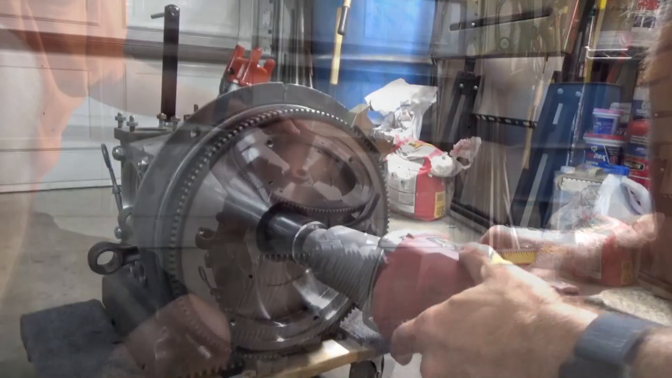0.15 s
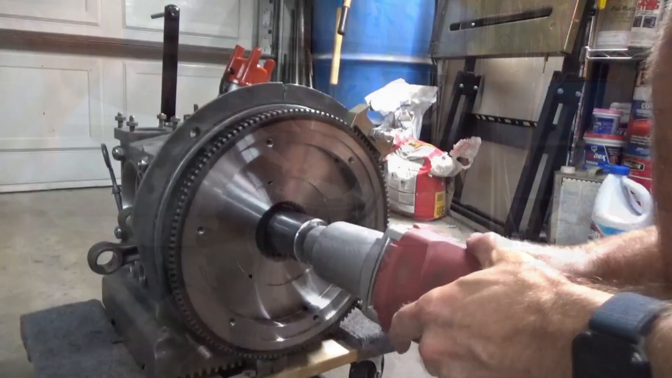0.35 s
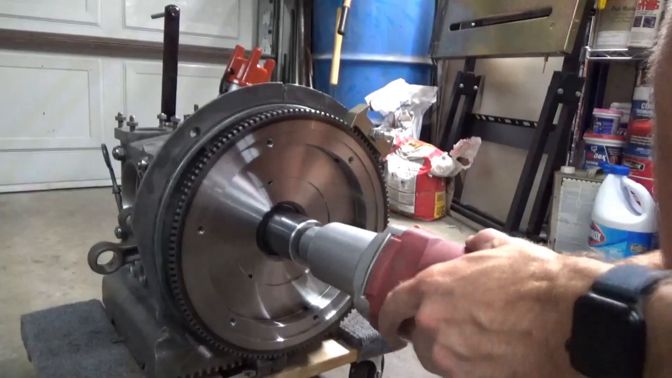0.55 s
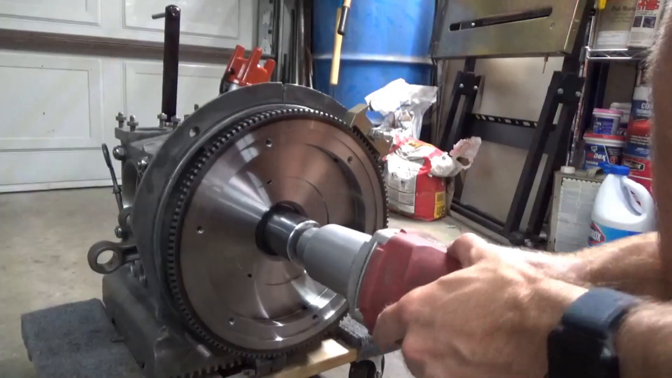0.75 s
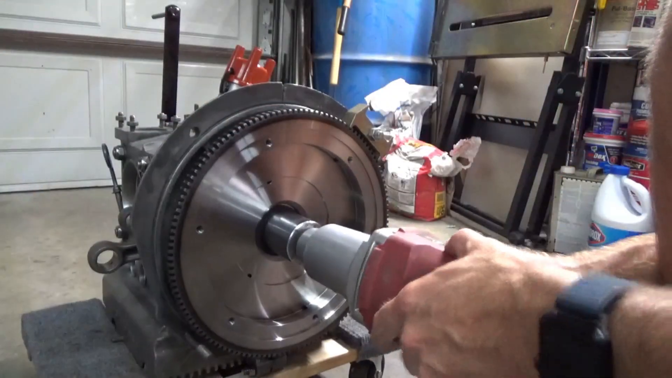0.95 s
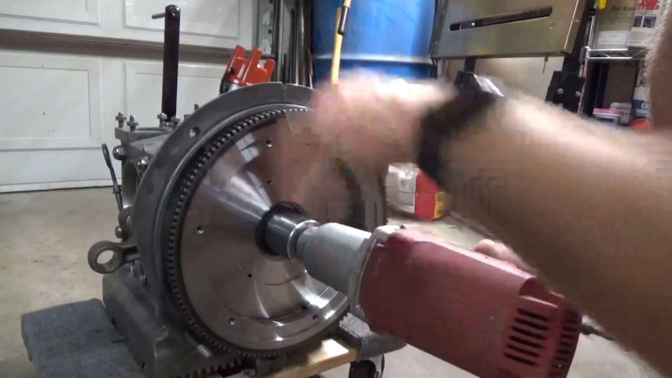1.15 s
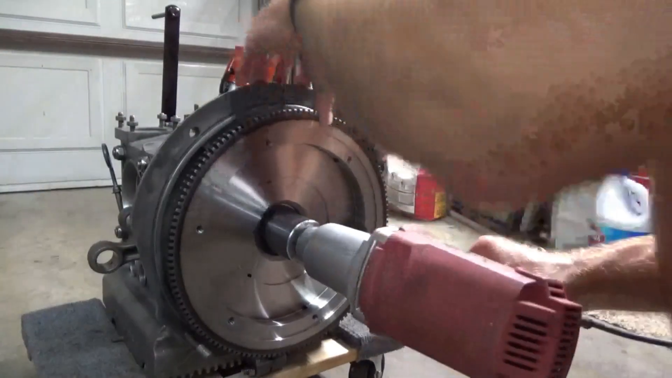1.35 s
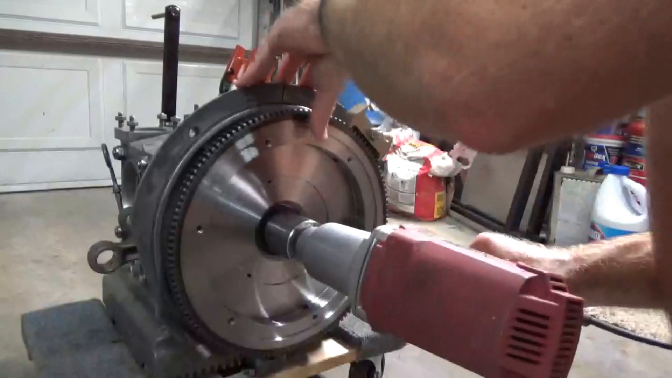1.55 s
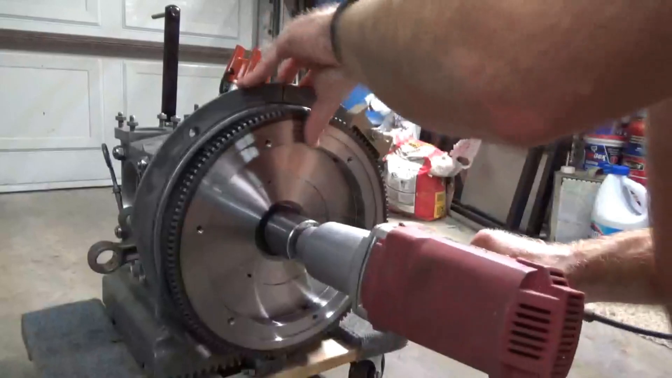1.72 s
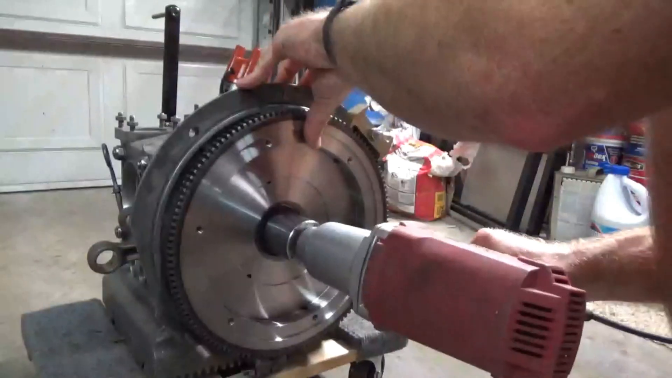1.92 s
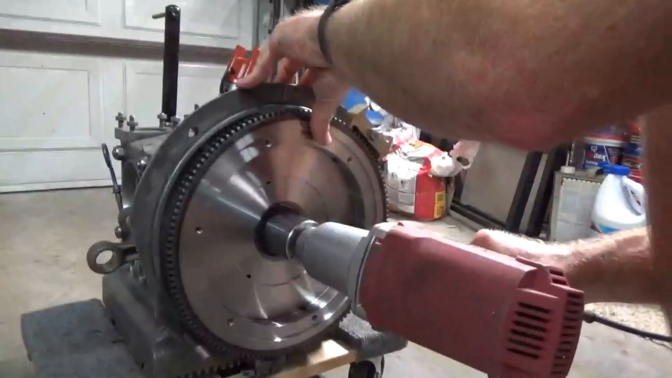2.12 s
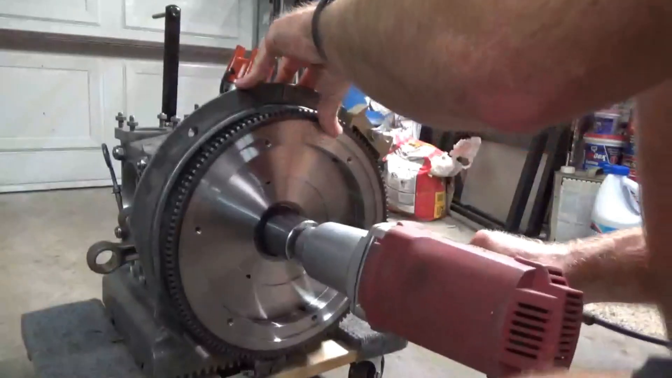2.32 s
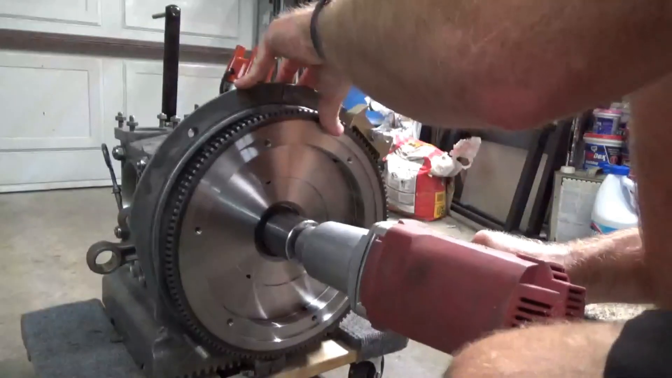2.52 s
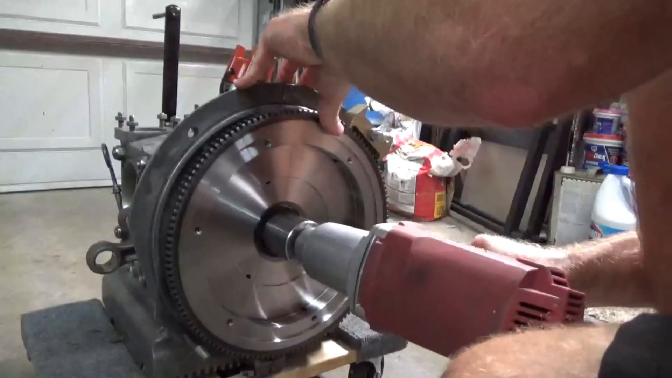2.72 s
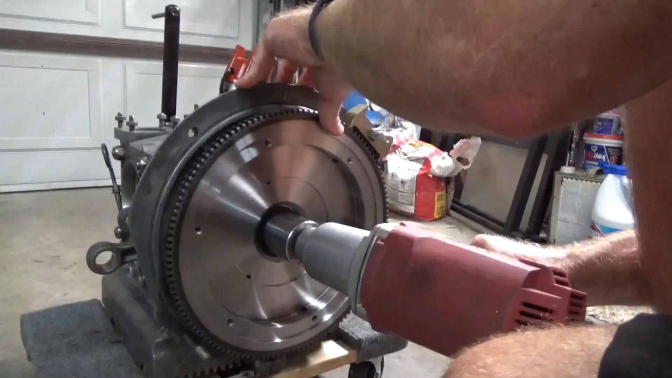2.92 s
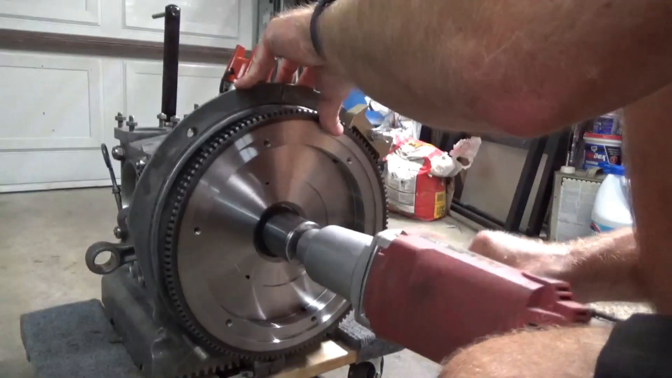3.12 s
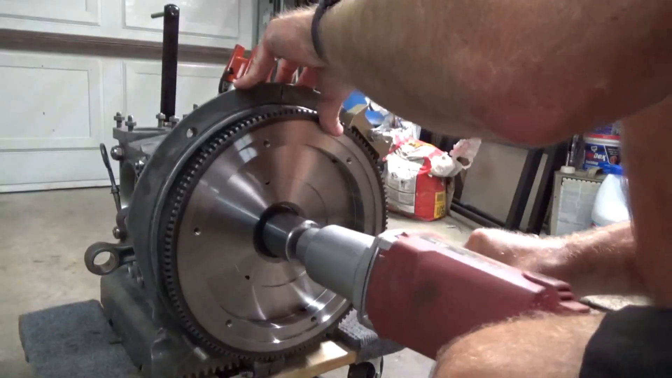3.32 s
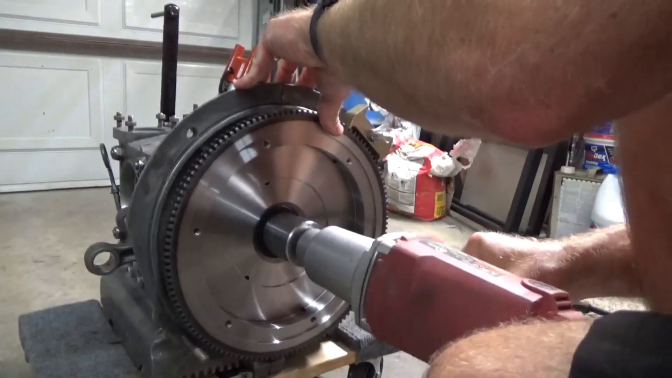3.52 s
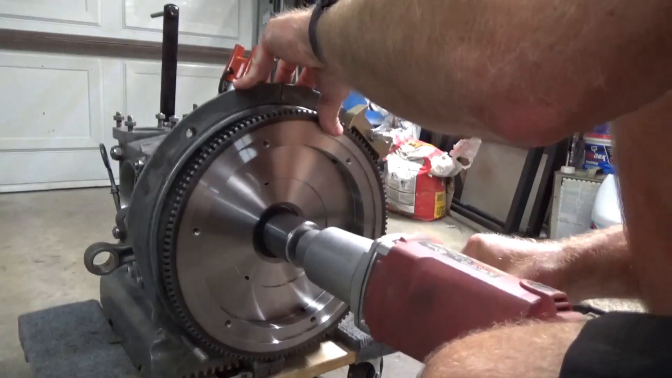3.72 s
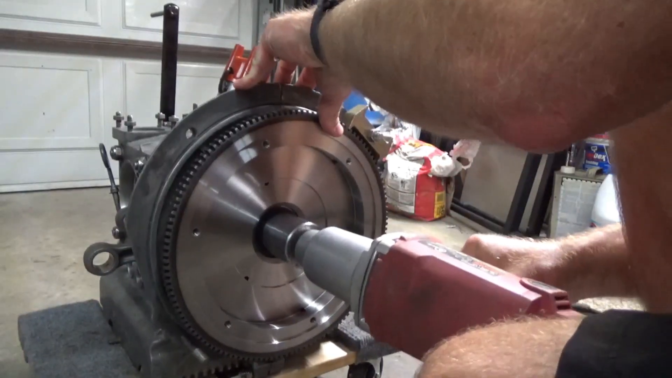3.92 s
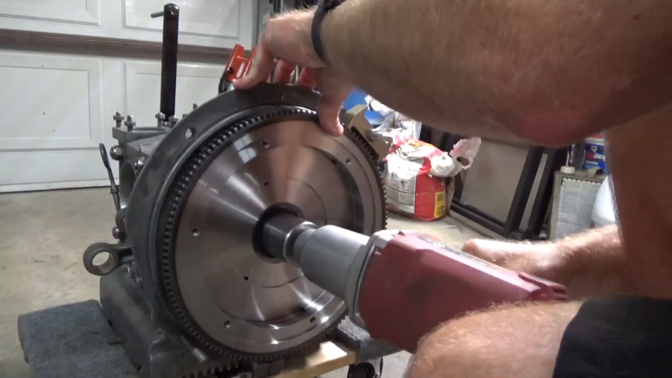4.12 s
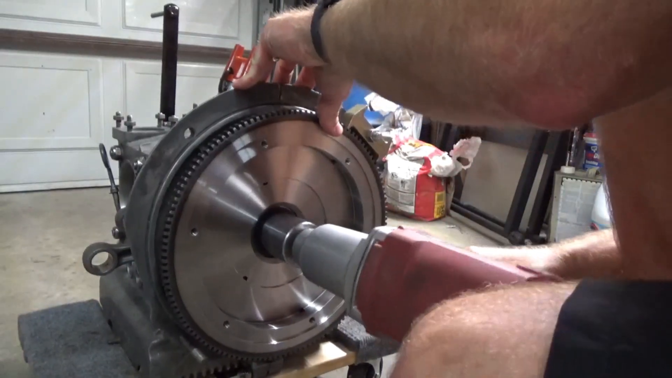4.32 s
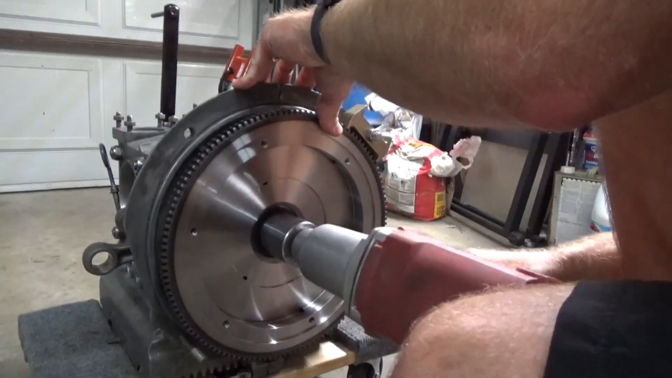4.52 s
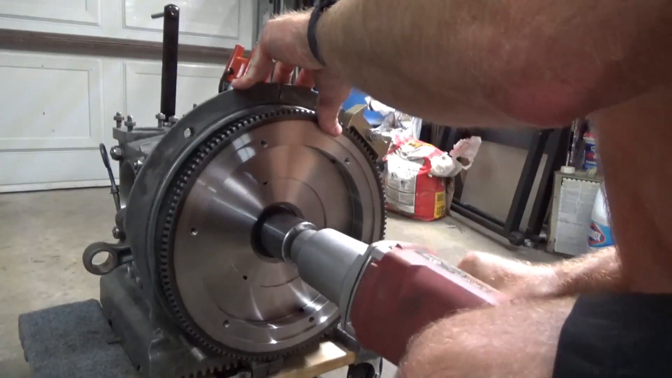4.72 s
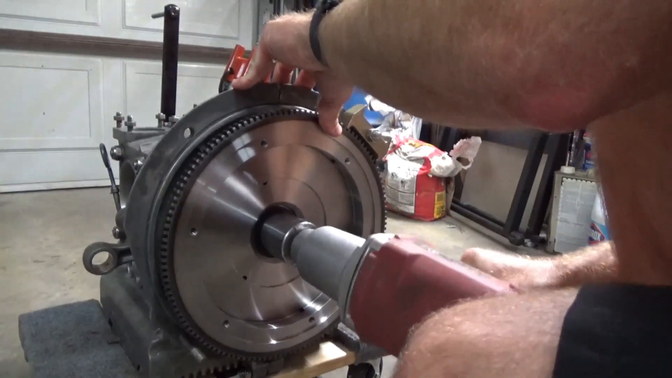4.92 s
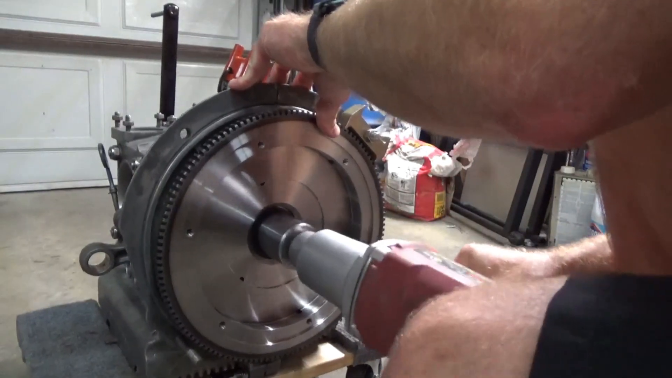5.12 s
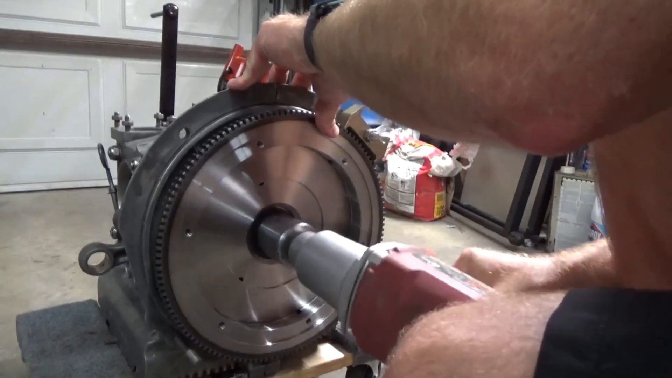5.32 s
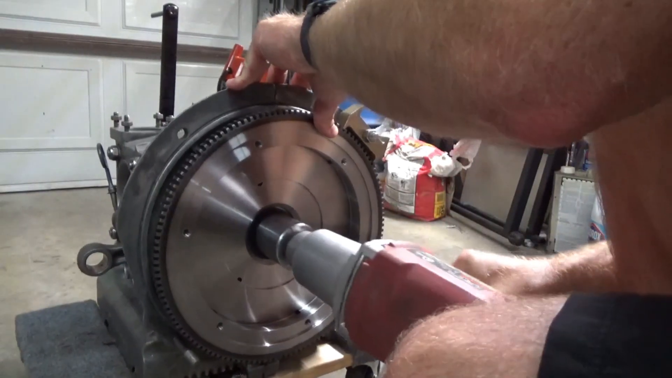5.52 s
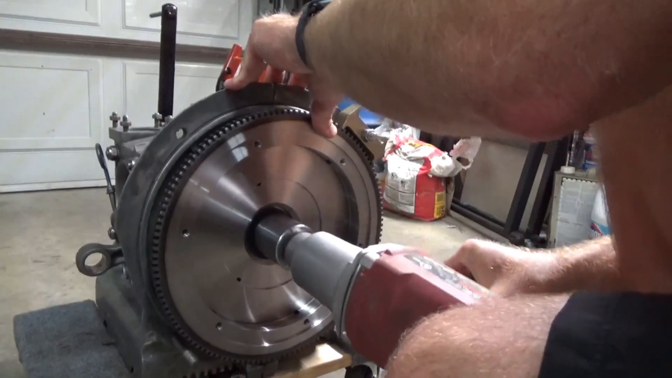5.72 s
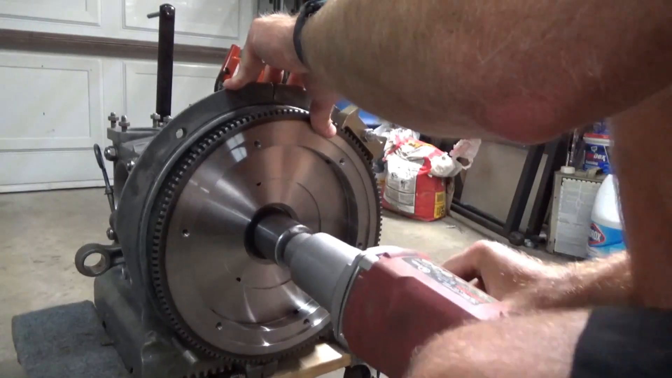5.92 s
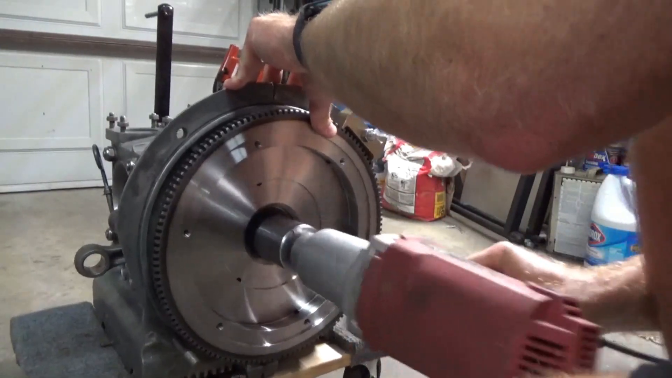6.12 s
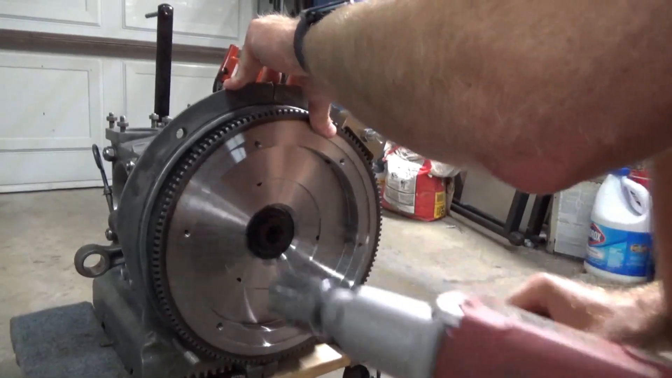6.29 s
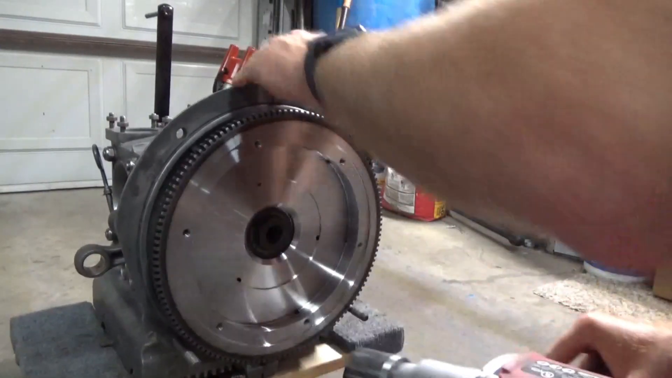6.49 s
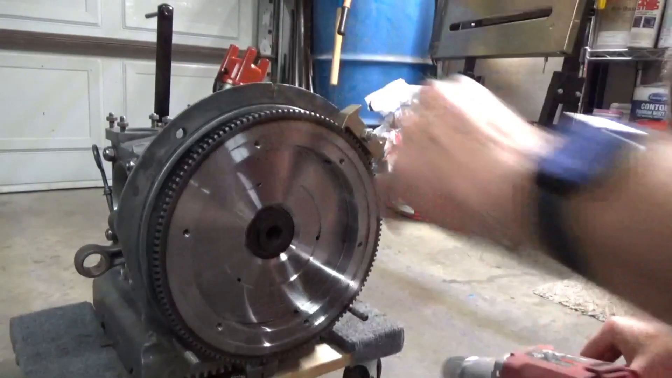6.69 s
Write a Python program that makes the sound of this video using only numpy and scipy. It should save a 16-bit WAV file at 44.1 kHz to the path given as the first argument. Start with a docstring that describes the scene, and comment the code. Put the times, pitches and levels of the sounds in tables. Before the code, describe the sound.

A garage with low room rumble and a faint, slightly wavering motor hum. From 0 to 0.45 s a socket lightly knocks and fumbles against a heavy flywheel; at 0.5-0.6 s come firmer clunks, a rub and one loud ringing clank at 0.57 s. Until 3 s there are only faint taps, soft rustles of hands and clothes, and a small knock at 2.5 s. At 3.1 s an electric impact wrench very close by takes up slack and bursts into harsh, bright hammering, about 45 blows a second, with gear rattle and a few bass thumps. Released at 4.1 s, it slows to separate blows and taps, stopping by 4.6 s as the reverberation fades; the background is now much quieter. A second, shorter burst hammers from 4.95 to 5.27 s, then winds down by 5.85 s. At 5.97 s the socket pulls off with a bright clink, followed by very faint contacts.

```python
"""A socket clinks and knocks onto a flywheel's centre nut, hands and clothes rub, something hums in the garage.
An electric impact wrench, just in front of the microphones, then hammers in two bursts, about 45 blows a second,
slowing each time the trigger is let go. The background sinks away once it has started; at the end the socket
is pulled off with a clink. Contacts and blows are shaped noise that rings resonances of the metal parts;
gears and rubs are uneven noise, the hum is sine tones, and the garage answers with decaying noise."""
import sys
import numpy as np
from scipy import signal
from scipy.fft import rfft, irfft, next_fast_len
from scipy.io import wavfile
from scipy.ndimage import uniform_filter1d, minimum_filter1d

SR = 44100
rng = np.random.default_rng(int(sys.argv[2]) if len(sys.argv) > 2 else 0)


def transcribe(signal):
    """Save signal, clipped to [-1, 1], as a 16-bit WAV file at the path in sys.argv[1]."""
    frames = np.atleast_2d(signal).T
    limited = np.clip(frames, -1, 1)
    pcm = np.round(limited * 32767).astype(np.int16)
    wavfile.write(sys.argv[1], SR, pcm)


N = 297664
TIME = np.arange(N) / SR
CUTOFF_HZ = 11080  # top of the band that the microphones pass on


def amp(db):
    """Decibels to gain."""
    return 10 ** (np.asarray(db) / 20)


def rms(x):
    """Root mean square."""
    return np.sqrt(np.mean(x ** 2) + 1e-20)


def at_hz(points, hz):
    """Read a spectrum on a log-frequency axis."""
    known_hz, values = np.transpose(points)
    return np.interp(np.log(hz + 1e-3), np.log(known_hz), values)


def colour(x, spectrum):
    """Give x a smooth spectrum; white input keeps its power below the cut-off."""
    size = next_fast_len(x.shape[-1] + 2048)
    hz = np.arange(size // 2 + 1) * SR / size
    gain = amp(at_hz(spectrum, hz))
    gain = gain / rms(gain * (hz < CUTOFF_HZ))
    return irfft(rfft(x, size) * gain, size)[..., :x.shape[-1]]


def add(track, s, sound):
    """Mix a sound into a track at time s."""
    i = max(0, int(s * SR))
    track[i:i + len(sound)] += sound[:N - i]


def resonate(x, modes):
    """Parallel two-pole resonances, as loud in sum as their input."""
    out = 0
    for hz, width_hz, level_db in modes:
        radius = np.exp(-np.pi * width_hz / SR)
        poles = [1, -2 * radius * np.cos(2 * np.pi * hz / SR), radius * radius]
        ring = signal.lfilter([1, 0, -1], poles, x + 1e-18)
        out = out + amp(level_db) * np.sqrt(width_hz) * ring
    return out * rms(x) / rms(out)


def high_pass(x, low_hz):
    """Take the bass away."""
    return signal.sosfilt(signal.butter(2, low_hz, "high", fs=SR, output="sos"), x + 1e-18)


def bell(middle_s, spread_s, time):
    """A level that swells and fades smoothly around its middle."""
    return np.exp(-.5 * ((time - middle_s) / spread_s) ** 2)


def gritty(grit_db, size):
    """Noise of countless small contacts, uneven from one moment (size samples) to the next."""
    wander = np.sqrt(size) * uniform_filter1d(rng.standard_normal(N), size=size)
    grit = amp(grit_db * wander)
    return grit / rms(grit) * rng.standard_normal(N)


def stereo_noise(side_db):
    """White noise, partly alike at both microphones."""
    mid, side = rng.standard_normal((2, N))
    return mid + amp(side_db) * side * [[1], [-1]]


# course of the garage background: start_s, level_db (relative)
BACKGROUND = [(0, -3.5), (0.4, -3), (0.7, 0), (3.1, -2.5), (3.2, -17.5), (6.75, -26.5)]
# spectrum of the room air: pitch_hz, level_db (relative)
AIR = [(15, -53), (25, -19), (81, -6.5), (160, -13.5), (197, -7), (274, -13.5), (412, -10.5), (603, -18.5),
       (930, -19.5), (1330, -26), (3000, -23.5), (3770, -26.5), (4870, -27), (11000, -37), (14300, -68),
       (22000, -120)]
AIR_DB = -51.5
# tones of the hum, the last of which sets in later: pitch_hz, level_db (relative), start_s
HUM = [(97.8, -67, 0), (195.8, -54, 0), (391.6, -70, 0), (247.6, -58, 3.3)]


def background(air_db, hum_db):
    """Room air all round as coloured noise, and the slightly wavering hum of a distant motor as sine tones."""
    waver_db = .6 * np.interp(TIME, np.linspace(0, TIME[-1], 40), rng.standard_normal(40))
    tones = 0
    for hz, level_db, start_s in HUM:
        tone = np.sin(2 * np.pi * (hz * TIME + rng.random()))
        tones = tones + amp(level_db) * (TIME >= start_s) * tone
    air = amp(AIR_DB + air_db) * colour(stereo_noise(side_db=-9.0), AIR)
    start_s, level_db = np.transpose(BACKGROUND)
    course = amp(np.interp(TIME, start_s, level_db))
    return course * (air + amp(hum_db + waver_db) * tones)


# the engine's clusters of close modes: pitch_hz, level_db (relative), t60_s
ENGINE_MODES = [(714, -9.5, 0.4), (872, -2, 0.48), (945, -7.5, 0.5), (1323, -17, 0.64), (1554, -18, 0.35),
                (1686, -4, 0.45), (1910, 1, 0.15), (2030, -4, 0.57), (2100, -16, 0.62), (2580, -26, 0.31),
                (3210, -2, 0.17), (4100, -13.5, 0.2), (3950, -5.5, 0.58), (4180, -10.5, 0.65),
                (4500, -18.5, .4), (5256, -24.5, .35), (7400, -1, 0.39), (7700, -20, 0.45),
                (7160, -10.5, 0.59), (7900, 1.5, .3)]


def engine_body():
    """The ringing engine: clusters of close modes over the wash into which the casting's weak modes blur."""
    t = TIME[:int(.7 * SR)]
    wash_db, wash_t60 = -6.5, 0.49
    wash_colour = [(300, 4.0), (900, -2.5), (2100, -2.0), (4200, -5.0), (5000, -15), (11000, -12)]
    body = colour(amp(wash_db - 60 * t / wash_t60) * rng.standard_normal(len(t)), wash_colour)
    for hz, level_db, t60 in ENGINE_MODES:
        detune, phase = rng.uniform(-1, 1, (2, 6, 1))  # six modes in a cluster
        cluster_hz = hz + (45 + hz / 80) * detune
        cluster = np.sin(2 * np.pi * (cluster_hz * t + phase)).mean(axis=0)
        body = body + amp(level_db - 60 * t / t60) * cluster
    return body


# socket and tool touching the nut and flywheel:
# start_s, level_db (relative), thud_db (from the weight behind it), ring_db (of the engine, relative)
KNOCKS = [(0.002, -30, 0.5, -5), (0.07, -33, 0, -21), (0.208, -31.5, 5, -7), (0.214, -31.5, -13, -22),
          (0.471, -31.5, 8, 3), (0.498, -29, -0.5, 6.5), (0.513, -26, 14, -5), (0.539, -28, 9, -18),
          (0.574, -8, -9, 3), (0.611, -23, 11, -15), (0.819, -40, -17, -9), (1.015, -38, 7, 1),
          (1.225, -37.5, -3, -12), (1.483, -38, -19, -3), (1.854, -40, -17, -12), (1.895, -41.5, -20, -12),
          (2.481, -42.5, -2.5, -4), (2.506, -31.5, 12, -7), (3.098, -25.5, -12.5, -5),
          (4.947, -26.5, -10.5, 0), (5.971, -26, -15, -8), (6.096, -42.5, -24, -7), (6.118, -45, -11, -14),
          (6.678, -48, -15.5, -12)]


def knocks(rise_s, crack_s, crack_db, ring_db):
    """Each contact is a short crack, bright or dull by the weight behind it, and a click that rings the engine."""
    cracks, clicks, t = np.zeros(N), np.zeros(N), TIME[:2000]
    shape = np.minimum(t / rise_s, 1) * np.exp(-t / crack_s)
    for s, level_db, thud_db, free_db in KNOCKS + fumbles(count=3):
        hardness = [(200, thud_db - 12.5), (550, thud_db + 2.5), (850, thud_db + 11),
                    (2300, 0), (7000, -7), (11000, -20)]
        crack = colour(rng.standard_normal(len(t)) * shape, hardness)
        click = colour(signal.unit_impulse(len(t), 20), hardness)
        add(cracks, s, amp(level_db) * crack)
        add(clicks, s, amp(level_db + free_db) * click)
    ringing = signal.fftconvolve(clicks, engine_body())[:N]
    return amp(crack_db) * cracks + amp(ring_db) * ringing


# bass thumps under one early knock and some of the blows: start_s, level_db (relative)
THUMPS = [(0.071, -44), (3.456, -25), (3.505, -27), (3.771, -21), (3.859, -31), (3.95, -27.5),
          (5.272, -34.5), (5.457, -32.5), (5.564, -42)]


def thumps(level_db, decay_s, top_hz):
    """Short dull bass thumps: decaying noise kept to the low frequencies."""
    out, t = np.zeros(N), TIME[:4000]
    dull = [(30, -8), (100, 0), (top_hz, -4), (900, -30), (4000, -70)]
    for s, thump_db in THUMPS:
        thump = colour(rng.standard_normal(len(t)) * np.exp(-t / decay_s), dull)
        add(out, s, amp(thump_db + level_db) * thump / np.abs(thump).max())
    return out


# spells of handling the tool: start_s, end_s, level_db (typical, relative)
FUMBLES = [(0.244, 0.439, -45), (1.179, 1.302, -42.5), (6.182, 6.398, -63.5)]
FUMBLE_THUD_DB, FUMBLE_RING_DB = 6.5, -2


def fumbles(count):
    """A few light contacts at random moments of each spell of handling, as rows like those of the knocks."""
    rows = []
    for start_s, end_s, level_db in FUMBLES:
        for when, hard in rng.random((count, 2)):
            s = start_s + when * (end_s - start_s)
            rows.append((s, level_db + 6 * (hard - .5), FUMBLE_THUD_DB, FUMBLE_RING_DB))
    return rows


# hands, clothes and the socket sliding:
# middle_s, spread_s (half length), level_db (relative), pitch_hz (centre), spread_octaves (half width)
RUBS = [(0.548, 0.033, -40, 1220, 0.49), (0.85, 0.093, -63, 6000, 0.85), (1.058, 0.029, -45.5, 7000, 1.26),
        (1.119, 0.007, -52, 6000, 2.7), (1.233, 0.071, -60.5, 1400, 1.5), (1.408, 0.021, -52.5, 3280, 1.4),
        (2.21, 0.14, -59, 534, 0.53), (2.284, 0.093, -58, 6850, 4), (5.963, 0.0064, -47, 3960, 2.7)]


def rubbing(grain_db):
    """Each slide swells and fades, made of tiny uneven slips."""
    out, slips, hz = np.zeros(N), gritty(grain_db, size=70), np.geomspace(100, 16000, 40)
    for s, spread_s, level_db, centre_hz, octaves in RUBS:
        near = np.abs(TIME - s) < 3 * spread_s
        hump_db = -4.3 * (np.log2(hz / centre_hz) / octaves) ** 2
        slide = colour(slips[near], np.column_stack([hz, hump_db]))
        out[near] += amp(level_db) * bell(s, spread_s, TIME[near]) * slide
    return out


# clear pings of the loose socket: start_s, pitch_hz, level_db, t60_s
PINGS = [(0.5, 5200, -34, 0.023), (0.535, 7300, -43, 0.17), (0.554, 7330, -36, 0.038),
         (5.971, 8440, -22, 0.022), (5.972, 4530, -53, 0.37), (6.18, 6970, -71, 0.58),
         (6.678, 6920, -67, .6)]


def pings():
    """The loose socket rings with one thin decaying tone."""
    out, t = np.zeros(N), TIME[:SR]
    for s, hz, level_db, t60 in PINGS:
        add(out, s, amp(level_db - 60 * t / t60) * np.sin(2 * np.pi * hz * t))
    return out


SPIN_UP_S, COAST_S = .1006, .2883  # time constants


def spin(pull, release, top_speed):
    """Speed in blows per second: the motor spins up while the trigger is held, then coasts down."""
    held = np.clip(TIME, pull, release) - pull
    coasting = np.maximum(TIME - release, 0)
    return top_speed * (1 - np.exp(-held / SPIN_UP_S)) * np.exp(-coasting / COAST_S)


# the trigger is pulled twice: pull_s, load_s (gears take load), first_blow_s, release_s, standstill_s,
# top_speed (blows per s)
BURSTS = [(3.0925, 3.103, 3.1685, 4.1109, 4.61, 45.142), (4.9246, 4.973, 4.9729, 5.2659, 5.87, 45.977)]
# rattle of the loose drive as the first burst takes up its slack: middle_s, spread_s (half length), level_db
SLACK = (3.137, 0.015, -15)
GEAR_KNEE = 12.2  # blows per s, below which the gears quickly fall quiet


def gear_rattle(level_db, idle_db, stop_s, grit_db):
    """Motor, gears and fan follow the speed: quiet until they take load, then rattling until they stand still."""
    middle_s, spread_s, slack_db = SLACK
    slack = amp(slack_db) * bell(middle_s, spread_s, TIME)
    level = 0
    for pull, load, _, release, standstill, top_speed in BURSTS:
        speed = spin(pull, release, top_speed)
        whirr = amp(level_db) * (speed ** 2 / (speed ** 2 + GEAR_KNEE ** 2)) ** 2
        running = np.clip((standstill - TIME) / stop_s, 0, 1)
        level = level + running * np.where(TIME >= load, whirr + slack, amp(idle_db) * whirr)
    return level * gritty(grit_db, size=90)


STALL_SPEED = 13.5  # blows per s, the least at which the hammer still jumps over the anvil


def blow_times():
    """The hammer strikes once each time it comes round, until it stalls: rows of s, speed, s since taking load."""
    rows = []
    for pull, load, first, release, _, top_speed in BURSTS:
        speed = spin(pull, release, top_speed)
        turning = (TIME >= first) & (speed > STALL_SPEED)
        turns = np.cumsum(speed * turning) / SR
        strikes = np.diff(np.ceil(turns), prepend=0) > 0
        rows += zip(TIME[strikes], speed[strikes], TIME[strikes] - load)
    return np.array(rows)


# the hammer, too slow to jump, only taps the anvil: start_s, level_db (relative)
TAPS = [(3.104, -12), (3.117, -18.5), (4.518, -11), (4.55, -11), (4.563, -16), (5.635, -14), (5.642, -10.5),
        (5.662, -9)]
FULL_SPEED = 45  # blows per s at full power
# a blow before the socket has seated is weaker: dB at the moment of taking load, time constant of seating in s
UNSEATED_DB, SEAT_S = -10.5, 0.054


def hammer(force_db, rise_s, hold_s, decay_s, rebound_s, rebound_turn, rebound_db, slow_rebound_db,
           grit_db, tap_low_hz):
    """Blows clatter as hard as the hammer is fast; slow ones rebound later and more strongly. Taps lack bass."""
    blows, taps, t = np.zeros(N), np.zeros(N), TIME[:2000]

    def clatter(length_s):
        """The steel's burst: quick rise, hold, decay."""
        return np.minimum(t / rise_s, 1) * np.exp(-np.maximum(t - length_s, 0) / decay_s)

    times = blow_times()
    chances = rng.uniform(-0.92, 1, (len(times), 3))
    for (s, speed, loaded_s), (late, hard, long) in zip(times, chances):
        unseated_db = UNSEATED_DB * np.exp(-loaded_s / SEAT_S)
        force = amp(force_db + unseated_db) * speed / FULL_SPEED
        slowness = max(1 - speed / FULL_SPEED, 0)
        add(blows, s, force * clatter(hold_s * (1 + .4 * long)))
        rebound = force * amp(rebound_db + slow_rebound_db * slowness + 3 * hard)
        # part of the delay is a fixed share of a turn
        delay_s = rebound_s * (1 + 0.73 * late) + rebound_turn / speed
        add(blows, s + delay_s, rebound * clatter(hold_s * slowness))
    for s, level_db in TAPS:
        add(taps, s, amp(level_db) * clatter(hold_s))
    grit = gritty(grit_db, size=20)
    return blows * grit, high_pass(taps * grit, tap_low_hz)


def blow_by_blow(spread_db):
    """The hammer lands a little differently each time: a random gain that holds until the next blow."""
    s = blow_times()[:, 0]
    gains = amp(spread_db * rng.standard_normal(len(s) + 1))
    return gains[np.searchsorted(s, TIME)]


# how freely the parts ring, as the socket sits in each burst:
# flywheel_db, housing_db, shaft_db, anvil_db, socket_db
SEATS = [(-16, -18.5, -22.5, -17, -9.5), (-20, -13.5, -16.5, -13, -6)]
# change of these levels once the trigger is let go: flywheel_db, housing_db, shaft_db, anvil_db, socket_db
RELEASE_GAIN = (0.5, -1.5, 11, 1.5, 4)
RELAX_S = 0.042  # time constant


def seating():
    """Ring level of each part in dB: set anew by each burst, changing as the torque relaxes."""
    levels = np.zeros((len(RELEASE_GAIN), N))
    for (pull, _, _, release, _, _), seat in zip(BURSTS, SEATS):
        relaxed = 1 - np.exp(-np.maximum(TIME - release, 0) / RELAX_S)
        burst_levels = np.array(seat)[:, None] + np.outer(RELEASE_GAIN, relaxed)
        levels = np.where(TIME >= pull, burst_levels, levels)
    return levels


# resonances of each part: pitch_hz, width_hz, level_db (relative)
FLYWHEEL_RING = [(860, 40, -2), (899, 26, 0), (952, 60, -3)]
HOUSING_RING = [(1820, 170, -1), (2550, 110, -4), (3380, 140, -1), (3510, 110, -2)]
SHAFT_RING = [(4525, 70, -2), (5230, 100, 1)]
ANVIL_RING = [(6765, 120, 0), (7220, 180, -4), (7630, 120, -5)]
SOCKET_RING = [(8270, 200, -4), (8410, 110, 0)]
# spectra of the hammer's clatter and of motor and gears: pitch_hz, level_db (relative)
BLOW_COLOUR = [(40, -33), (150, -25.5), (400, -8), (700, -15), (1300, -3), (2000, -3.5), (3000, -0.5),
               (5500, 0), (7000, 4), (8700, 2), (9800, 3), (11000, -4.5)]
MOTOR_COLOUR = [(40, -15.5), (200, -10), (600, -7), (900, 5), (1250, 1), (1900, 4.5), (3400, 4), (5500, 1),
                (8000, 4), (11000, -5.5)]


def wrench(clatter_db, tap_ring_db):
    """Blows ring every part, taps the flywheel and anvil, gear rattle the flywheel, all over their direct noise."""
    flywheel, housing, shaft, anvil, socket = seating()
    blows, taps = hammer(force_db=-2.0, rise_s=0.00069, hold_s=0.0046, decay_s=0.0016, rebound_s=0.0046,
                         rebound_turn=.2, rebound_db=-9, slow_rebound_db=13.0, grit_db=3.0, tap_low_hz=450)
    gears = gear_rattle(level_db=-19.0, idle_db=-15, stop_s=0.038, grit_db=2.0)
    out = amp(clatter_db) * colour(blows + taps, BLOW_COLOUR)
    out += colour(gears, MOTOR_COLOUR)
    out += amp(flywheel) * resonate(blows + taps + gears, FLYWHEEL_RING)
    out += amp(tap_ring_db) * resonate(taps, ANVIL_RING)
    parts = ((housing, HOUSING_RING), (shaft, SHAFT_RING), (anvil, ANVIL_RING), (socket, SOCKET_RING))
    for level_db, modes in parts:
        out += amp(level_db) * resonate(blows * blow_by_blow(spread_db=3), modes)
    return out


# reverberation time of the garage: pitch_hz, t60_s
GARAGE_T60 = [(150, .45), (500, 0.53), (1400, 0.57), (3700, 0.59), (9700, 0.4)]
# spectrum at the start of its tail: pitch_hz, level_db (relative)
TAIL_COLOUR = [(100, 3.5), (300, 8.5), (900, 2.5), (2000, 1.5), (4500, 2), (8000, -6), (11000, 2)]


def garage(x, tail_db, early_db, early_s):
    """Near clutter scatters the treble at once, alike at both microphones; the wide tail dies band by band."""
    t = TIME[:int(.8 * SR)]
    edges = np.geomspace(90, 14000, 8)
    tail = 0
    for low, high in zip(edges, edges[1:]):
        band_pass = signal.butter(2, [low, high], "band", fs=SR, output="sos")
        band = signal.sosfilt(band_pass, rng.standard_normal((2, len(t))))
        hz = np.sqrt(low * high)
        tail = tail + band * amp(at_hz(TAIL_COLOUR, hz) - 60 * t / at_hz(GARAGE_T60, hz))
    tail = tail * np.clip(t / 0.004, 0, 1)
    early = rng.standard_normal(len(t)) * np.exp(-t / early_s) * (t > .001)
    early = colour(early, [(1000, -14), (2500, -5), (7000, 0)])
    echo = amp(tail_db) * tail / rms(tail) + amp(early_db) * early / rms(early)
    return x + signal.fftconvolve(x[None], echo / np.sqrt(len(t)), axes=1)[:, :N]


def scene():
    """Tool and handling sound just in front of the microphones, with the garage round them."""
    handling = knocks(rise_s=0.0025, crack_s=0.0033, crack_db=0.5, ring_db=-21)
    handling = handling + rubbing(grain_db=2.0) + pings()
    tool = wrench(clatter_db=-3.5, tap_ring_db=-11.5)
    tool = tool + thumps(level_db=4.0, decay_s=0.0063, top_hz=295.0)
    return (background(air_db=-2.5, hum_db=0.5)
            + garage(handling, tail_db=-14.0, early_db=-8, early_s=.005)
            + garage(tool, tail_db=-13.0, early_db=-10.5, early_s=0.0073))


def limiter(x, top_db, release_db_per_s):
    """The gain ducks at once under each peak and recovers at a steady rate, alike for both microphones."""
    over_db = np.maximum(20 * np.log10(np.abs(x).max(axis=0) + 1e-9) - top_db, 0)
    recovery_db = release_db_per_s * TIME
    held_db = np.maximum.accumulate(over_db + recovery_db) - recovery_db
    widened_db = -minimum_filter1d(-held_db, size=21)
    return x * amp(-uniform_filter1d(widened_db, size=21))


def record(dry):
    """The top is cut, the loudest peaks are limited and flattened by overload, and the top is cut again."""
    low_pass = signal.ellip(12, .1, 80, CUTOFF_HZ, fs=SR, output="sos")
    limited = limiter(signal.sosfilt(low_pass, dry), top_db=-1.5, release_db_per_s=1500)
    flattened = limited / (1 + (limited / .56) ** 4) ** (1 / 4)
    return signal.sosfiltfilt(low_pass, flattened)


dry = scene()
out = record(dry)
transcribe(out)
```